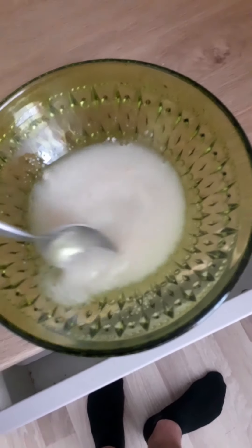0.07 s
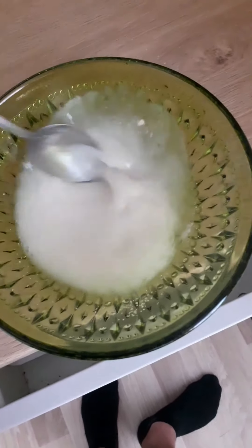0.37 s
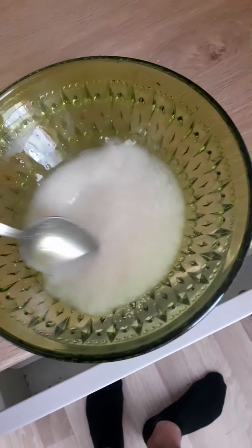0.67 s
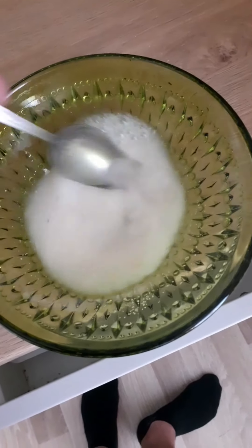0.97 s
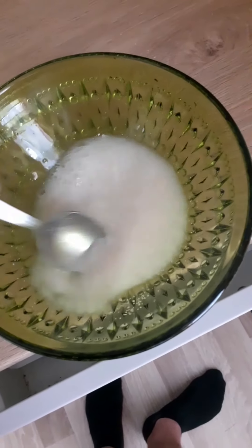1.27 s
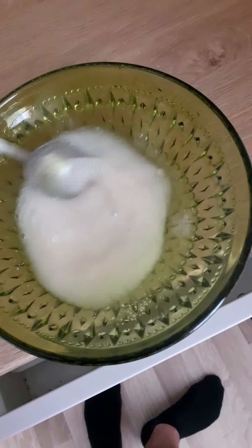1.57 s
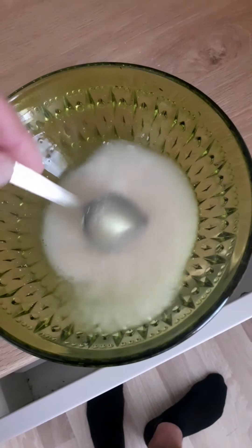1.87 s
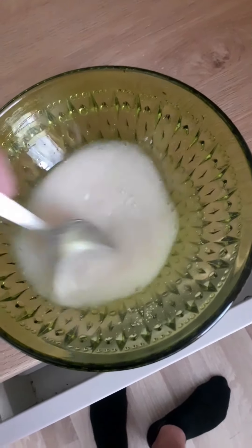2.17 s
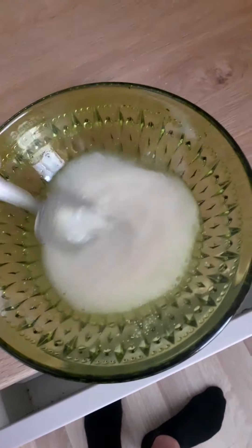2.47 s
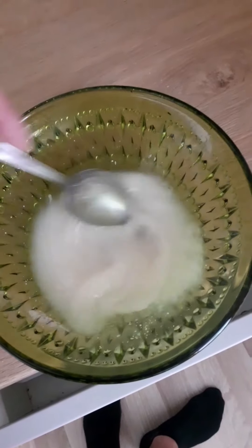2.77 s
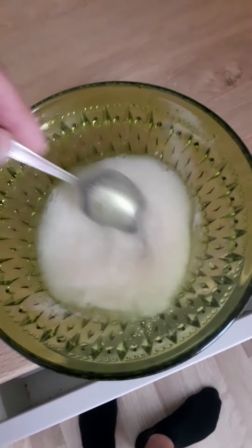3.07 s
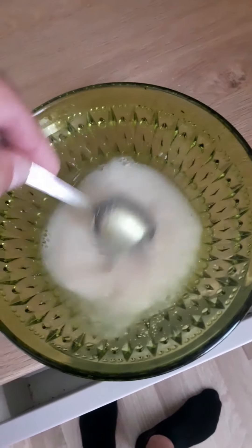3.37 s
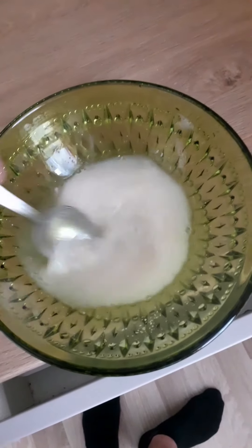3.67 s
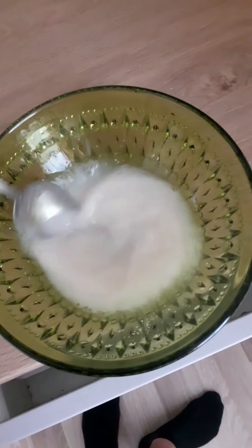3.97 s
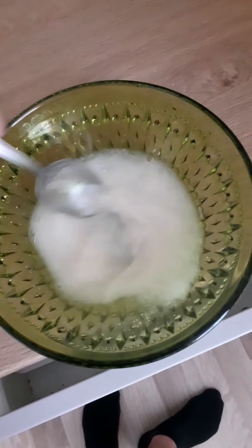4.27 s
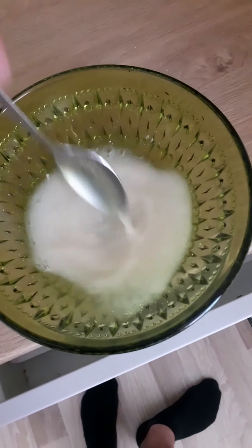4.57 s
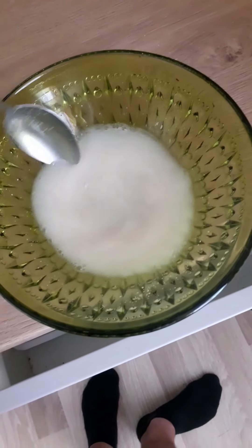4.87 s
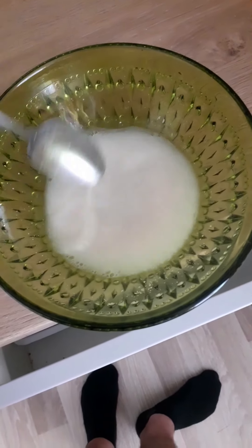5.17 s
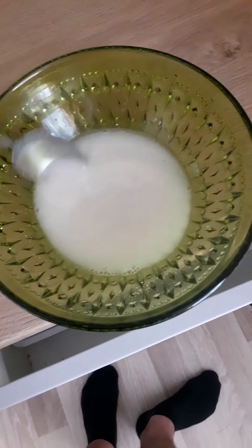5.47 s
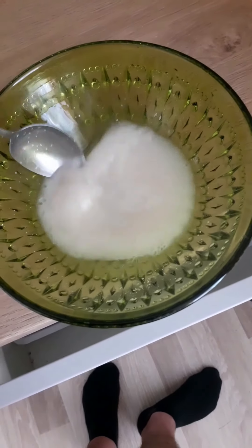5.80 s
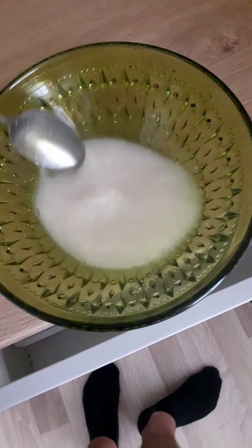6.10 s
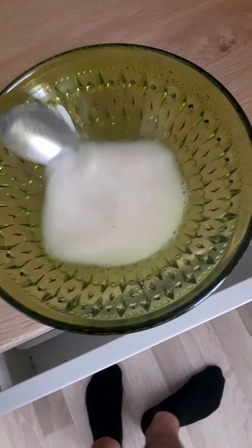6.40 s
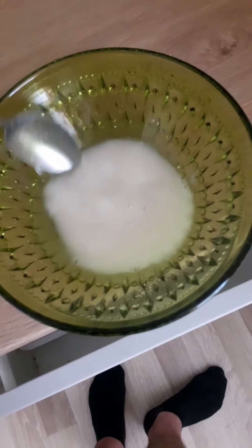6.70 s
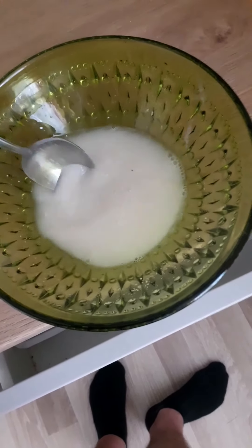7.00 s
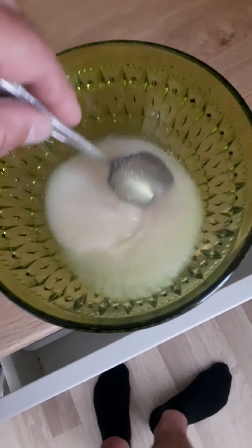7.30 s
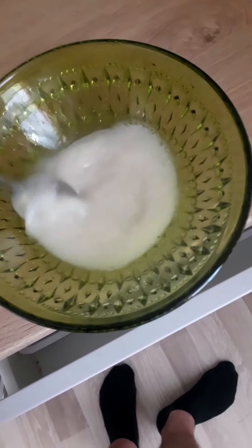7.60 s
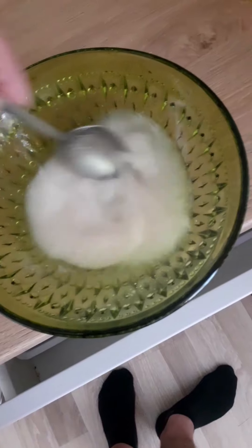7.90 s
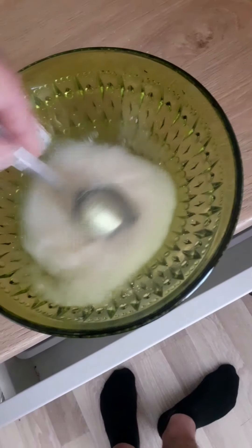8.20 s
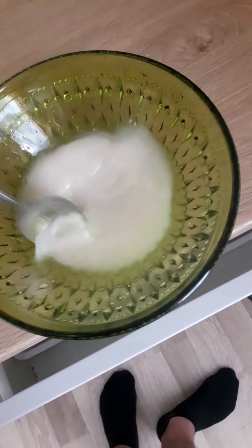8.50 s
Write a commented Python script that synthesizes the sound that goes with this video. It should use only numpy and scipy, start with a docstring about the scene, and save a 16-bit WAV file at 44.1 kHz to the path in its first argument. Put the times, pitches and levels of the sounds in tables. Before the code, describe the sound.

A steel spoon stirs thin batter in a glass bowl, heard close by with a little kitchen reverberation. From the start until about 4.4 seconds it circles briskly, two or three turns a second, each with a gritty grind, a soft wet swish and a sharp, uneven clack against the wall. The blows and friction make the glass ring lightly, and the bowl rocks on the counter with a faint low rumble. The stirring eases, and at about 4.8 seconds the spoon knocks on the glass in a quick, bright cluster, with another sharp knock near 5.4 seconds. From roughly 4.9 to 6.9 seconds it scrapes the wall in short, quieter, hollow rasping strokes, with a few light ticks. At 7 seconds a clack restarts the stirring, and the grinding and sloshing go on, with strong clinks around 7.6 and 8.5 seconds.

```python
"""Gritty grinding and sharp clacks, close by: a steel spoon stirs thin batter in a pressed-glass bowl.
On each turn the spoon hits the wall and drags grit along it. Blows and friction ring the glass,
and the bowl rocks on the kitchen counter, which rumbles. Halfway the spoon is knocked on the wall
and scrapes it in short, hollow strokes, then the stirring goes on."""
import sys
import numpy as np
from scipy import signal
from scipy.fft import rfft, irfft, next_fast_len
from scipy.io import wavfile
from scipy.ndimage import uniform_filter1d, map_coordinates

SR = 44100
rng = np.random.default_rng(int(sys.argv[2]) if len(sys.argv) > 2 else 0)


def wav_record(signal):
    """Record a signal, one row per channel, as 16-bit PCM in the file named by sys.argv[1]."""
    frames = np.transpose(np.atleast_2d(signal))
    bounded = np.clip(frames, -1, 1)
    # unit amplitude maps onto the largest positive 16-bit level
    quanta = np.round(bounded * 32767).astype(np.int16)
    wavfile.write(sys.argv[1], SR, quanta)


N = 381465


def amp(db):
    """Decibels to gain."""
    return 10 ** (np.asarray(db) / 20)


def unit(x):
    """Scale to rms 1."""
    return x / np.sqrt(np.mean(x ** 2) + 1e-20)


def unit_peak(x):
    """Scale to peak 1."""
    return x / np.abs(x).max()


def along(points, hz):
    """Interpolate (freq_hz, value) points on a log axis."""
    freq_hz, values = np.transpose(points)
    return np.interp(np.log(hz + 1), np.log(freq_hz + 1), values)


def curves(rows):
    """One value per sample for each column after the time."""
    time_s, *columns = np.transpose(rows)
    return [np.interp(np.arange(N) / SR, time_s, column) for column in columns]


def wobble(knots_per_s):
    """Smooth random curve."""
    knots = rng.standard_normal(int(N * knots_per_s / SR) + 4)
    return map_coordinates(knots, [np.arange(N) * knots_per_s / SR])


def filtered(x, response):
    """Apply a frequency response."""
    n = x.shape[-1]
    size = next_fast_len(n + SR // 4)
    return irfft(rfft(x, size) * response(np.fft.rfftfreq(size, 1 / SR)), size)[..., :n]


def coloured(x, spectrum, size=4096):
    """Minimum-phase filter from (freq_hz, gain_db) points."""
    cepstrum = irfft(np.log(amp(along(spectrum, np.fft.rfftfreq(size, 1 / SR)))))
    cepstrum[1:size // 2] *= 2
    cepstrum[size // 2 + 1:] = 0
    return signal.fftconvolve(x, irfft(np.exp(rfft(cepstrum))))[:len(x)]


def resonance(f, hz, width_hz):
    """Response of one damped resonance."""
    return 1j * f * width_hz / (hz * hz - f * f + 1j * f * width_hz)


def add(track, start_s, sound):
    """Mix a sound into a track."""
    i = max(round(start_s * SR), 0)
    track[..., i:i + sound.shape[-1]] += sound[..., :max(N - i, 0)]


def spread(make, apart):
    """Stereo pair: a shared part plus one for each side alone."""
    shared = make()
    return np.array([unit(shared + apart * make()) for _ in range(2)])


def flutter(width_hz, apart):
    """Slow stereo noise that widens a tone into a band."""
    return spread(lambda: filtered(rng.standard_normal(N), lambda f: 1 / (1 + (2 * f / width_hz) ** 2)),
                  apart)


def patchy(x, depth_db, size=512):
    """Patches of the spectrum swell and fade, as resonances do under a moving contact."""
    frames = signal.stft(x, nperseg=size)[2]
    field = rng.standard_normal(frames.shape[-2:])
    for _ in range(2):
        field = uniform_filter1d(uniform_filter1d(field, size=4, axis=0), size=6, axis=1)
    return signal.istft(frames * amp(depth_db * unit(field)), nperseg=size)[1][..., :N]


def grit(spectrum, slips_per_s, scatter_db, smooth):
    """Tiny slips of uneven size over a smooth rub."""
    slips = (rng.random(N) < slips_per_s / SR) * rng.standard_normal(N)
    slips *= amp(scatter_db * rng.standard_normal(N))
    return coloured(unit(unit(slips) + smooth * rng.standard_normal(N)), spectrum)


# spoon sweeps along the glass: start_s, length_s, grind_db, batter_db, rock_db, pitch_hz, treble_db
SWEEPS = [(0, .19, -29.5, -39, -40, 2453, -2), (0.366, .05, -38.5, -57, -47, 3330, 8),
          (.51, .19, -39.5, -52, -67, 3123, -2.5), (0.739, .15, -25.5, -38, -43, 2877, -7),
          (0.939, .08, -26.5, -37.5, -64, 2191, -2), (1.051, .06, -39, -41, -81, 2900, 16.5),
          (1.16, .07, -25, -36, -62, 2743, -1), (1.3, .06, -20.5, -40, -40.5, 2700, -16),
          (1.365, .05, -22, -34, -60, 2625, 0), (1.47, .11, -34, -44.5, -73, 2600, -7.5),
          (1.725, 0.038, -41.5, -40, -64, 2780, 9.5), (1.753, .15, -30.5, -36.5, -45, 2817, -2.5),
          (2.11, 0.073, -43, -42, -55, 2700, 7), (2.194, 0.092, -27, -39, -48, 2446, -3),
          (2.339, .04, -39, -45.5, -60, 2750, 4.5), (2.574, .15, -27.5, -36, -39.5, 2965, -0.5),
          (2.951, .15, -35, -38.5, -48, 2735, 2.5), (3.25, 0.054, -41, -46, -62, 2940, 2.5),
          (3.32, .18, -35, -39.5, -56, 2850, 1.5), (3.608, .24, -47.5, -46, -57, 3434, 7.5),
          (4.003, 0.118, -34, -38.5, -42.5, 3370, 2), (4.36, .05, -46.5, -46.5, -57, 3600, 7),
          (4.792, 0.036, -39, -30.5, -44.5, 2710, 6.5), (5.371, 0.0493, -45, -58, -50, 2900, -1),
          (6.991, .09, -45.5, -36, -41, 3252, 9), (7.264, .05, -31, -36.5, -58, 3300, 2.5),
          (7.319, .13, -29.5, -39.5, -43, 3264, -2), (7.477, .08, -36, -43, -51, 2793, -9.5),
          (7.586, .05, -30.5, -34.5, -42, 3035, 2.5), (7.692, .08, -33, -37.5, -45, 3145, -3.5),
          (7.834, .06, -28.5, -36, -53, 3367, -0.5), (8.059, 0.071, -35.5, -34, -51, 2930, -1.5),
          (8.19, .11, -36, -39, -61, 3365, 0.5), (8.514, .11, -33, -35, -42.5, 2757, -2)]
# spoon in the batter: start_s, end_s
SUBMERGED = [(0, 4.19), (7.0, 12)]


def effort_db(lean_db_per_s=645, ease_db_per_s=42, lift_db_per_s=190):
    """Grind and batter levels: the strongest sweep rules, over a light touch while submerged."""
    t = np.arange(N) / SR
    lifted_s = np.min([np.abs(t - np.clip(t, start_s, end_s)) for start_s, end_s in SUBMERGED], axis=0)
    force_db = -49 - lift_db_per_s * lifted_s
    flow_db = -50.5 - lift_db_per_s * lifted_s
    for start_s, length_s, grind_db, batter_db, *_ in SWEEPS:
        age_s = t - start_s
        pressure_db = (lean_db_per_s * np.minimum(age_s, 0)
                       - ease_db_per_s * np.clip(age_s, 0, length_s)
                       - lift_db_per_s * np.maximum(age_s - length_s, 0))
        force_db = np.maximum(force_db, grind_db + pressure_db)
        flow_db = np.maximum(flow_db, batter_db + pressure_db)
    return force_db, flow_db


# grit between steel and glass: freq_hz, gain_db
GRIND_SPECTRUM = [(300, -27), (1000, -12.5), (1900, -5.5), (2700, -7.5), (3600, -7), (4600, -6.5),
                  (6500, -7), (7800, -12), (8900, -20), (11500, -19), (13500, -25), (15500, -20.5)]
# resonances under the grinding: freq_hz, width_hz, gain_db
GRIND_RESONANCES = [(597, 80, -16.5), (1280, 40, 3.5), (2735, 40, 14), (3456, 360, 6), (7560, 200, -8)]
# moving batter: freq_hz, gain_db
BATTER_SPECTRUM = [(100, -21.5), (180, -11), (275, -4.5), (370, -6.5), (520, -3.5), (660, 0.5), (830, 6),
                   (1000, -7.5), (1270, 3.5), (1800, -4), (3000, -42.5), (8000, -66.5)]


def stirring(gain_db=-1, whine_db=-2, treble_hz=5540.0, left_db=2):
    """Grit grinds between steel and glass while the batter is pushed round."""
    force_db, flow_db = effort_db()
    tilt_hz, treble_db = curves([(start_s + length_s / 2, hz, db)
                                 for start_s, length_s, *_, hz, db in SWEEPS])
    judder_db = 2.5 * wobble(70)
    rub = spread(lambda: grit(GRIND_SPECTRUM, slips_per_s=900, scatter_db=6, smooth=1), apart=1)
    rub = patchy(rub, depth_db=3.5)
    rub = unit(filtered(rub, lambda f: 1 + sum(amp(db) * resonance(f, hz, width_hz)
                                               for hz, width_hz, db in GRIND_RESONANCES)))
    treble = filtered(rub, lambda f: f ** 4 / (f ** 4 + treble_hz ** 4))
    rub += (amp(treble_db) - 1) * treble
    # the contact resonance glides as the spoon tilts
    whine = unit(flutter(width_hz=340, apart=0.23) * np.cos(2 * np.pi * np.cumsum(tilt_hz) / SR))
    grind = amp(force_db) * unit(amp(judder_db) * (rub + amp(whine_db) * whine))
    slosh = spread(lambda: grit(BATTER_SPECTRUM, slips_per_s=600, scatter_db=0.5, smooth=0.65),
                   apart=0.19)
    batter = amp(flow_db) * unit(amp(0.204 * judder_db) * patchy(slosh, depth_db=2.5))
    return amp(gain_db) * (grind * amp([[left_db], [-left_db]]) + batter)


# glass bowl: freq_hz, struck_db, rubbed_db, t60_s
BOWL_MODES = [(267, -38, -24, .35), (643, -27, -10, .42), (1525, -23, -9.5, 2.6), (2088, -35, -20, .2),
              (2740, -21, -6, .6), (4229, -23.5, -25, .45), (5966, -37, -30, .3), (7915, -33, -30, .26),
              (12592, -38, -48, .24), (15220, -47, -54, .18)]
# how well a blow rings the glass, most where it is bare: time_s, gain_db, slope_db_per_octave
BOWL_RESPONSE = [(0, -10, -6.5), (4.6, -14.5, 2), (4.78, -3.5, 5), (4.88, -9, 5.5), (5.36, -0.5, -5),
                 (5.5, 7, -20), (6.56, -10, -8), (6.91, 10, -30), (7.0, -16, -9), (8.65, -3, -7)]


def bowl_ring(rub, friction_db=-2, pressed_t60_ratio=0.4, waver_db=1.06, beat_hz=0.7, beat_depth=0.91):
    """Each glass mode stores the energy of blows and friction and lets it leak away."""
    t, out = np.arange(N) / SR, np.zeros((2, N))
    start_s, level_db = np.transpose(CLACKS)[:2]
    hits = (start_s * SR).astype(int)
    gain_db, slope_db_per_octave = (column[hits] for column in curves(BOWL_RESPONSE))
    friction = np.mean(rub ** 2, axis=0)
    waver, drift_rad = wobble(17), 0.35 * wobble(22)
    for hz, struck_db, rubbed_db, t60_s in BOWL_MODES:
        octaves_away = abs(np.log2(hz / 1500))
        blow_db = level_db + gain_db + slope_db_per_octave * octaves_away + struck_db
        blows = np.bincount(hits, amp(blow_db) ** 2, N)
        free_decay = amp(-60 / (t60_s * SR)) ** 2
        pressed_decay = free_decay ** (1 / pressed_t60_ratio)  # the spoon damps the wall
        # each mode is a close pair, so it beats
        beating = signal.lfilter([1], [1, -free_decay * np.exp(2j * np.pi * beat_hz / SR)], blows).real
        struck = (signal.lfilter([1], [1, -free_decay], blows) + beat_depth * beating) / 2
        rubbed = signal.lfilter([1 - pressed_decay], [1, -pressed_decay], friction)
        energy = struck + amp(rubbed_db + friction_db) ** 2 * rubbed
        shift = rng.integers(N)
        envelope = np.sqrt(np.abs(energy)) * amp(waver_db * np.roll(waver, shift))
        phase = 2 * np.pi * hz * t + np.roll(drift_rad, shift)
        out += envelope * np.sin([phase, phase - np.pi / 3])  # lobes reach the two sides out of step
    return out


# counter boom: freq_hz, gain_db
COUNTER_SPECTRUM = [(20, -27), (45, -25), (70, -7.5), (88, -17.5), (101, 7.5), (122, -9.5), (170, -20),
                    (270, -7), (500, -29.5), (2000, -86)]


def counter_rumble(push_db=3, clack_db=-46, drag_db=-25, rest_db=-71, tip_s=0.013, fall_db_per_s=109.5):
    """Each sweep and blow rocks the bowl on the counter, which booms at its own low note."""
    pushes = np.zeros(N)
    for start_s, _, _, _, rock_db, *_ in SWEEPS:
        add(pushes, start_s, amp([rock_db + push_db]) ** 2)
    for start_s, level_db, *_ in CLACKS:
        add(pushes, start_s, amp([level_db + clack_db + push_db]) ** 2)
    t = np.arange(SR) / SR
    rocking = (1 - np.exp(-(t / tip_s) ** 2)) * amp(-fall_db_per_s * t)
    force_db, _ = effort_db()
    energy = np.abs(signal.fftconvolve(pushes, rocking ** 2)[:N])
    energy += amp(force_db + drag_db) ** 2 + amp(rest_db) ** 2
    return np.sqrt(energy) * unit(coloured(rng.standard_normal(N), COUNTER_SPECTRUM))


# hand-damped spoon: pitch_ratio, level_db, t60_s
SPOON_MODES = [(.27, -33, 0.086), (.5, -32.5, 0.017), (.93, -14.5, .022), (1, 22.5, 0.032),
               (1.16, 10.5, 0.067), (1.36, -0.5, 0.093), (1.8, -3, 0.011), (2.6, -37, 0.011)]


def spoon_ring(pitch_hz, length_s=0.1, scatter_db=0.5):
    """Steel modes die fast in the hand; their strengths vary with each blow."""
    t = np.arange(int(length_s * SR)) / SR
    return sum(amp(level_db + scatter_db * rng.standard_normal() - 60 * t / t60_s)
               * np.sin(2 * np.pi * ratio * pitch_hz * t) for ratio, level_db, t60_s in SPOON_MODES)


# spoon hits glass: start_s, level_db, hardness_db, pitch_hz, pan_left_db
CLACKS = [(0.1432, -17.5, -24, 2760, 2), (.279, -32, -20, 2610, 6), (0.3238, -31.5, -24, 2570, 6),
          (.3533, -22, -31, 3210, 4.5), (0.4655, -6, 4, 3090, -3), (0.6318, -21.5, -23, 2930, 5.5),
          (0.7337, -5, -17.5, 2775, 7.5), (0.751, -17.5, -38, 2860, 13.5), (.93, -14, -13, 2655, 8),
          (1.045, -21.5, 3, 2500, 7.5), (1.118, -15, -1, 3150, 8.5), (1.1518, -9, 6.5, 2670, 3.5),
          (1.292, -9.5, -16.5, 2590, 8.5), (1.5272, -20.5, -49, 2634, 6.5), (1.7579, -6, -24.5, 2811, 6),
          (1.888, -27, -39.5, 2720, 1.5), (2.1794, -7.5, -14.5, 2720, 11), (2.3265, -19, -43.5, 2770, 10.5),
          (2.5841, -3, -20, 2763, 7), (2.9552, -2.5, -11.5, 2643, 2.5), (3.1227, -29, -24, 2670, 5.5),
          (3.3167, -4, -19.5, 2880, 5.5), (3.4315, -34, -15, 2700, -7), (3.7864, -21, -22.5, 2760, 2.5),
          (3.8657, -29, -44, 3800, 4.5), (3.9987, -13, -23, 3370, 5), (4.0909, -23, -36, 3616, 2.5),
          (4.233, -28, -33, 3600, 2.5), (4.2853, -30.5, -50, 3300, 3.5), (4.4367, -33, -25.5, 2820, 5.5),
          (4.481, -34, -42.5, 3600, 4.5), (4.7748, -6, 17, 2660, 6), (4.782, -9, 0, 2720, 3),
          (4.7917, -22, 0, 2650, -9), (4.8025, -12, -6.5, 2850, -4.5), (4.9005, -25, -5, 2750, 13.5),
          (5.056, -25.5, -26, 2750, 2.5), (5.365, -8, 3.5, 3000, 0.5), (5.4951, -21.5, -20.5, 2920, 6.5),
          (5.536, -24, -51.5, 3330, 3), (6.046, -32.5, -23.5, 2930, 6.5), (6.5572, -21.5, 21.5, 2860, -2),
          (6.908, -24.5, -22.5, 2970, 4), (6.999, -6.5, -28.5, 3220, 1), (7.5772, -6.5, -18.5, 2936, 10),
          (7.6851, -6.5, -27.5, 3307, 3.5), (7.875, -16.5, -37, 3320, 4.5), (8.073, -13, -14, 2770, 11.5),
          (8.1843, -27, -28, 3540, 2.5), (8.526, -5, -14, 2744, 5)]
# contact crack: freq_hz, gain_db
CRACK_SPECTRUM = [(30, -62.5), (150, -38), (400, -13), (750, -3.5), (2000, -11), (2900, -2.5), (4300, 2),
                  (6500, 1), (7900, 4), (9000, -11), (12500, -10.5), (15500, -20.5)]


def clacks(gain_db=4, skid_db=-15, skid_s=0.002, crack_t60_s=0.0077, chatter_db=-7, settle_s=0.004):
    """The spoon skids in, cracks against the wall, rings, and chatters once as it settles."""
    out, lead = np.zeros((2, N)), SR // 40
    t = (np.arange(SR // 8) - lead) / SR
    skid = amp(skid_db) * np.exp(-np.abs(t) / skid_s)
    contact = np.where(t < 0, skid, amp(-60 * np.abs(t) / crack_t60_s))

    def crack():
        return coloured(contact * rng.standard_normal(len(t)), CRACK_SPECTRUM)

    for start_s, level_db, hardness_db, pitch_hz, pan_left_db in CLACKS:
        steel = unit_peak(spread(lambda: spoon_ring(pitch_hz), apart=0.93))
        steel = np.pad(steel, ((0, 0), (lead, len(t))))[:, :len(t)]
        crack_db = -5 + 0.62 * (hardness_db + 35)  # harder contact: more crack, less tone
        blow = unit_peak(steel + amp(crack_db) * unit_peak(spread(crack, apart=0.71)))
        chatter = unit_peak(spread(crack, apart=0.74))
        sides = amp(level_db + np.array([[pan_left_db], [-pan_left_db]]) / 2)
        onset_s = start_s - lead / SR
        add(out, onset_s, sides * amp(gain_db) * blow)
        add(out, onset_s + settle_s * rng.uniform(0.5, 1.5), sides * amp(chatter_db) * chatter)
    return out


# short strokes on the wall: centre_s, rasp_db, pitch_hz, hollow_db, sigma_s
STROKES = [(0.52, -41, 1160, -41, 0.021), (0.6077, -29, 1226, -35.5, 0.036),
           (4.8988, -17, 977, -41.5, 0.011), (4.9556, -23, 1274, -38.5, 0.011),
           (4.9995, -28, 1210, -41.5, 0.014), (5.046, -27, 1120, -60, 0.041),
           (5.4896, -26, 1279, -41.5, 0.042), (5.5363, -53.5, 1143, -34.5, 0.012),
           (5.6455, -22.5, 1450, -64, 0.028), (5.8004, -26, 1231, -44, 0.02),
           (5.9067, -23, 1250, -67, 0.015), (6.042, -42.5, 1199, -47.5, 0.035),
           (6.1285, -19, 1320, -52, 0.015), (6.269, -44.5, 1253, -52, 0.035),
           (6.369, -31, 1387, -45.5, 0.014), (6.458, -35.5, 1373, -49.5, 0.03),
           (6.5176, -39, 1293, -44.5, 0.0099), (6.581, -30.5, 1380, -44, 0.0091),
           (6.6914, -33, 1250, -43, 0.018), (6.7834, -23.5, 1437, -45.5, 0.013),
           (6.879, -31.5, 1390, -45, 0.021), (6.9063, -34, 1234, -37.5, 0.016)]
# scraping rasp: freq_hz, gain_db
RASP_SPECTRUM = [(300, -21.5), (800, 1), (1400, -7), (2100, -14), (3100, -1), (4700, -9.5), (5800, 0),
                 (6800, -11.5), (7900, -4), (9200, -23.5), (12000, -19.5), (15500, -25)]


def scraping(rasp_gain_db=-15, fall_per_s=1.5, overtone_ratio=2.8, overtone_db=-13):
    """Each stroke rasps and sounds the wet hollow under the spoon, whose pitch sinks as it opens."""
    t, out = np.arange(N) / SR, np.zeros((2, N))
    rasp = spread(lambda: grit(RASP_SPECTRUM, slips_per_s=1500, scatter_db=6.5, smooth=0.45), apart=1)
    rasp = amp(rasp_gain_db) * unit(patchy(rasp, depth_db=5))
    hollow_noise = flutter(width_hz=190, apart=0.61)
    for centre_s, rasp_db, pitch_hz, hollow_db, sigma_s in STROKES:
        span = np.abs(t - centre_s) < 1 / 8
        offset_s = t[span] - centre_s
        sinking_hz = pitch_hz * np.exp(-fall_per_s * rng.uniform(0, 2) * offset_s)
        phase = 2 * np.pi * np.cumsum(sinking_hz) / SR
        tone = np.cos(phase) + amp(overtone_db) * np.cos(overtone_ratio * phase)
        hollow = unit(hollow_noise[:, span] * tone)
        swell = np.exp(-(offset_s / sigma_s) ** 2 / 2)
        out[:, span] += swell * (amp(rasp_db) * rasp[:, span] + amp(hollow_db) * hollow)
    return out


# kitchen reverberation: freq_hz, t60_s
KITCHEN_DECAY = [(150, 0.54), (1000, 0.85), (3500, 0.41), (8000, 0.33), (15000, 0.62)]


def kitchen_echo(x, near_db=-6, near_t60_s=0.044, walls_db=-9):
    """Bowl and counter reflect at once, the walls later; the paths change as the spoon moves."""
    out, hop = np.zeros((2, N)), SR // 3
    for i in range(0, N, hop):
        hz, t, frames = signal.stft(rng.standard_normal((2, SR // 2)), SR, nperseg=256)
        decay = amp(-60 * t / along(KITCHEN_DECAY, hz)[:, None])
        walls = signal.istft(frames * decay, SR, nperseg=256)[1]
        age_s = np.arange(walls.shape[1]) / SR
        walls *= 1 - np.exp(-age_s / 0.0009)
        near = rng.standard_normal(walls.shape) * amp(-60 * age_s / near_t60_s) * (age_s > 0.0007)
        echo = amp(walls_db) * walls / np.linalg.norm(walls[0])
        echo += amp(near_db) * near / np.linalg.norm(near[0])
        add(out, i / SR, signal.fftconvolve(x[:, i:i + hop], echo, axes=1))
    return out


# steady background: freq_hz, gain_db
BACKGROUND_SPECTRUM = [(15, -54), (25, -24), (242, 7), (354, -1.5), (1400, -24.5), (1520, -27), (1650, -38),
                       (3430, -20.5), (9320, -23), (12200, -13.5), (16000, -42)]


def background(level_db=-65):
    """Faint, steady low noise with a little hiss."""
    noise = spread(lambda: coloured(rng.standard_normal(N), BACKGROUND_SPECTRUM), apart=0.17)
    return amp(level_db) * noise


def scene(lag_samples=3):
    """The spoon works a little to the left, so the right side hears it later."""
    rub = stirring() + scraping()
    left, right = clacks() + rub
    spoon = np.array([left, np.pad(right, (lag_samples, 0))[:N]])
    return spoon + kitchen_echo(spoon) + bowl_ring(rub) + counter_rumble() + background()


def record(dry, top_hz=15850):
    """Soft clip near full scale, then a brick-wall low-pass."""
    rounded = dry / (1 + dry ** 6) ** (1 / 6)
    return filtered(rounded, lambda f: f < top_hz)


dry = scene()
out = record(dry)
wav_record(out)
```